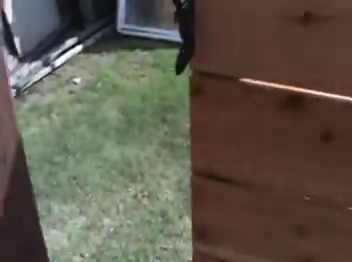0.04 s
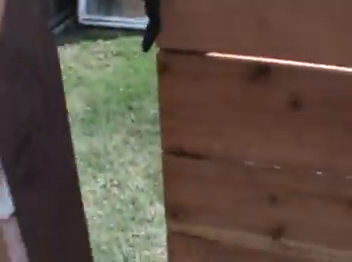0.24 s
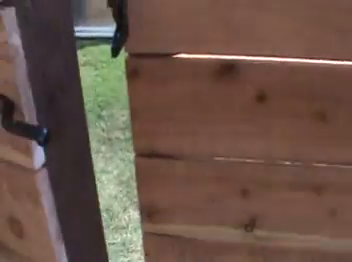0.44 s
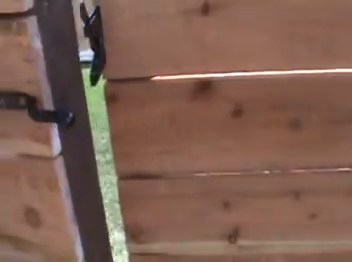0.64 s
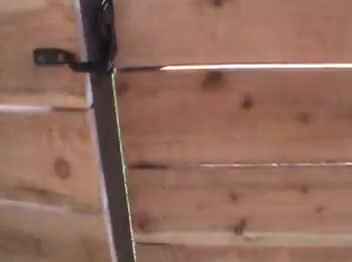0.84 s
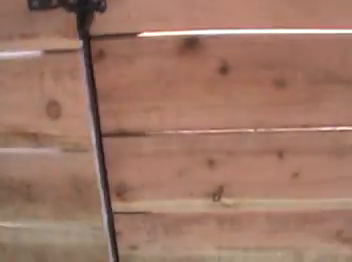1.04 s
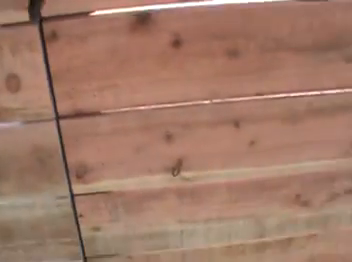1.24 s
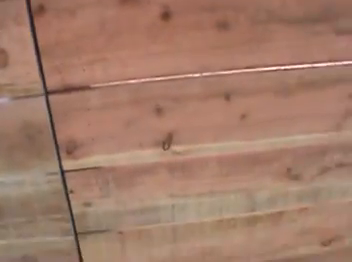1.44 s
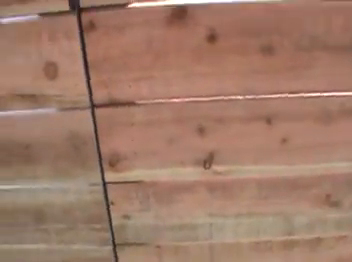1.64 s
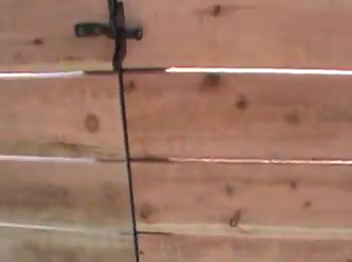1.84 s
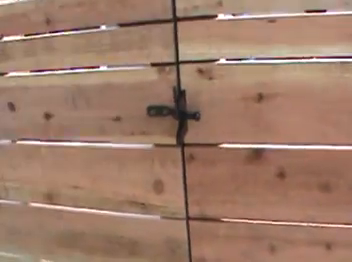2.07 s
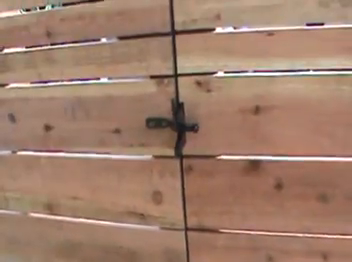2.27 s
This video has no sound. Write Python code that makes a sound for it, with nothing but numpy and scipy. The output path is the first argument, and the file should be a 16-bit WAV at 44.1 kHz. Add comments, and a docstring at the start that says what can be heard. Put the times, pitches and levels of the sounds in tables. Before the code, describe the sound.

Metal gate latch clacking and rattling outdoors, following a faint hinge squeak.

```python
"""A wooden garden gate, close to a hand-held stereo microphone, with a far hush behind it and light
wind on both ports. First the gate swings shut, its hinge rubbing and squeaking faintly. From 1.2 s the
steel latch is shaken in its catch: clacks and scrapes ring the steel and knock the boards, the bar rings
free between contacts, and the fence answers briefly. At 2.1 s the rattle cuts off abruptly, leaving its
short echo and the hush."""
import sys
import numpy as np
from scipy import signal
from scipy.fft import rfft, irfft, next_fast_len
from scipy.io import wavfile
from scipy.ndimage import uniform_filter1d, minimum_filter1d, map_coordinates

SR = 44100
rng = np.random.default_rng(int(sys.argv[2]) if len(sys.argv) > 2 else 0)


def wav_record(signal):
    """Record a signal, one row per channel, as 16-bit PCM in the file named by sys.argv[1]."""
    frames = np.transpose(np.atleast_2d(signal))
    bounded = np.clip(frames, -1, 1)
    # unit amplitude maps onto the largest positive 16-bit level
    quanta = np.round(bounded * 32767).astype(np.int16)
    wavfile.write(sys.argv[1], SR, quanta)


N = 101782
TIME = np.arange(N) / SR


def amp(db):
    return 10 ** (np.asarray(db) / 20)


def unit_rms(x):
    return x / np.sqrt(np.mean(x ** 2, axis=-1, keepdims=True) + 1e-20)


def along(points, hz):
    """Read (Hz, value) points on a log frequency axis."""
    freqs, values = np.transpose(points)
    return np.interp(np.log(hz + 1), np.log(freqs + 1), values)


def level_curves(rows):
    """A dB curve for each level column, silent outside the rows' times."""
    times, *columns = np.transpose(rows)
    return [np.interp(TIME, times, db, left=-120, right=-120) for db in columns]


def wobble(rate):
    """A smooth random curve, rate knots a second."""
    return map_coordinates(rng.standard_normal(int(N * rate / SR) + 4), [TIME * rate])


def filtered(x, response):
    """Pass x through a complex response of frequency."""
    size = next_fast_len(x.shape[-1] + SR // 4)
    return irfft(rfft(x, size) * response(np.fft.rfftfreq(size, 1 / SR)), size)[..., :x.shape[-1]]


def stereo_noise(colour, correlation):
    """Coloured noise of rms 1, partly alike left and right."""
    mid, side = unit_rms(filtered(rng.standard_normal((2, N)), lambda hz: amp(along(colour, hz))))
    turn = np.arccos(correlation) / 2
    return np.cos(turn) * mid + np.sin(turn) * side * [[1], [-1]]


# The air beyond the garden. Each row: frequency in Hz, relative level in dB.
HUSH_COLOUR = [(35, -31), (60, -3.5), (220, 2), (880, -8), (2800, -13.5), (11000, -24.5), (16000, -47)]

def distant_hush():
    """A steady low hush from far off, nearly the same on both sides."""
    return amp(-40.5) * stereo_noise(HUSH_COLOUR, 0.89)


# Wind at the microphone. Each row: frequency in Hz, relative level in dB.
WIND_COLOUR = [(25, 0), (65, 1), (150, -5.5), (400, -26.5), (900, -44)]
# Single puffs. Each row: time of the crest in seconds, level in dB.
WIND_PUFFS = [(0.212, -45.5), (.306, -41), (0.507, -42), (0.676, -38), (0.731, -46), (1.45, -35.5),
              (2.04, -38)]

def port_wind(breeze_db=-42, puff_s=0.093):
    """A breeze and its puffs rumble on the two ports, unevenly from side to side."""
    strength = amp(breeze_db) + sum(amp(db) * np.exp(-((TIME - s) / puff_s) ** 2) for s, db in WIND_PUFFS)
    port_db = 1.1 * np.array([wobble(32), wobble(9.9)]) + [[1.1], [-1.1]]
    return strength * amp(port_db) * stereo_noise(WIND_COLOUR, 0.46)


# The fence beside the gate. Each row: frequency in Hz, seconds to fall 60 dB.
FENCE_DECAY = [(200, 0.14), (10000, 0.09)]

def fence_echo(x):
    """The fence throws back a short diffuse echo whose treble dies first."""
    hz, t, spectrum = signal.stft(rng.standard_normal((2, SR // 2)), SR, nperseg=256)
    decay = amp(-60 * t / along(FENCE_DECAY, hz)[:, None])
    tail = signal.istft(spectrum * decay, SR, nperseg=256)[1]
    return signal.fftconvolve(x[None], tail / np.linalg.norm(tail[0]), axes=1)[:, :N]


# The hinge rubbing through the swing. Each row: time in seconds, level in dB.
HINGE_RUB = [(0, -46), (.645, -46.5), (.66, -35), (.78, -42), (.85, -44), (.862, -38), (.89, -43.5),
             (1.2, -50.5)]
# The hiss of that rubbing. Each row: frequency in Hz, relative level in dB.
HINGE_COLOUR = [(900, -4), (3400, -3), (4850, -3.5), (5400, -9), (15000, -23)]
# Squeaks. Each row: start and end in seconds, first, middle and last pitch in Hz, level in dB.
HINGE_SQUEAKS = [(.235, 0.347, 3420, 3620, 3500, -43), (.35, 0.473, 2400, 2390, 2450, -51.5),
                 (.47, .555, 4930, 5250, 5050, -51.5), (0.434, .66, 10500, 12030, 11400, -51),
                 (0.647, 0.884, 1626, 1645, 1480, -42.5), (0.658, 0.709, 3650, 3000, 3670, -40.5),
                 (0.691, 0.73, 4900, 4830, 4800, -40.5)]

def hinge(waver_hz=70, stutter_db=4, stutter_rate=110):
    """The turning hinge rubs with a faint hiss and thin squeaks that glide and stutter."""
    out = amp(level_curves(HINGE_RUB)[0] + 1.8 * wobble(stutter_rate)) * stereo_noise(HINGE_COLOUR, 0.46)
    for start, end, first, middle, last, db in HINGE_SQUEAKS:
        progress = np.clip((TIME - start) / (end - start), 0, 1)
        bend = (4 * middle - 2 * first - 2 * last) * progress * (1 - progress)
        hz = first + (last - first) * progress + bend
        phase = 2 * np.pi * np.cumsum(hz + waver_hz * wobble(870)) / SR
        swell = np.sqrt(np.sin(np.pi * progress)) * (progress < 1)
        out += amp(db + stutter_db * wobble(stutter_rate)) * swell * np.sin(phase)
    return out


def resonate(x, modes, scatter_db, colour=None, colour_db=0, detune=0):
    """Ring each row of x through its own scattered modes plus a broad colour, at unit power gain."""
    gains = amp(scatter_db * rng.standard_normal((len(x), len(modes), 1)))
    drift = detune / 4000 * rng.standard_normal(gains.shape)  # detune: share of the pitch at 4 kHz
    def response(hz):
        total = amp(colour_db + along(colour, hz)) if colour else 0
        for k, (mode_hz, width, db) in enumerate(modes):
            centre = mode_hz + drift[:, k] * mode_hz ** 2
            damping = 1j * hz * width
            total = total + (-1) ** k * gains[:, k] * amp(db) * damping / (centre**2 - hz**2 + damping)
        return total / np.sqrt(np.mean(abs(total) ** 2, axis=-1, keepdims=True))
    return filtered(x, response)


# Modes of the latch and of the boards. Each row: frequency in Hz, width in Hz, relative level in dB.
LATCH_MODES = [(1321, 21.5, 13), (1612, 40, 7), (2450, 68, -10), (3720, 125, 2), (4217, 160, -2.5),
               (6750, 240, -31)]
BOARD_MODES = [(209.6, 23, -3.5), (333.6, 59.4, 1.5), (663, 102, -2.5), (937, 92, -2)]
# Bright modes of the latch bar. Each row: frequency in Hz, relative level in dB.
BAR_MODES = [(3780, -8.5), (5640, -2), (6240, -7.5), (7910, -9), (9200, -10.5), (10300, -6.5), (12400, -15),
             (13600, -32)]
# Broad colour between the steel's modes. Each row: frequency in Hz, relative level in dB.
LATCH_COLOUR = [(450, -20), (1100, -9), (1400, 4), (2800, -3.5), (5300, -12), (6800, -3.5), (7500, -53)]
BAR_COLOUR = [(10000, 3), (11700, -11), (13500, 1.5), (15500, -31)]

def gate_parts(drive, scatter_db=0, hardness=0, detune=0, bar_width_hz=37):
    """Three drives ring the latch (brighter when struck hard), its bar and the boards."""
    knee_hz = 2000 * 2 ** (abs(hardness) / 4)
    def latch_tilt(hz):
        tilt_db = hardness * np.log2(np.clip(hz, 1000, knee_hz) / 2000)
        loss_db = 2.5 * np.log2(np.maximum(hz / knee_hz, 1))
        return amp(tilt_db - loss_db) / (1 + (hz / 7160) ** 10)
    latch = resonate(drive[0], LATCH_MODES, scatter_db, LATCH_COLOUR, colour_db=2.5, detune=detune)
    touching_modes = [(hz, bar_width_hz, db) for hz, db in BAR_MODES]
    bar = resonate(drive[1], touching_modes, scatter_db, BAR_COLOUR, colour_db=7)
    boards = resonate(drive[2], BOARD_MODES, scatter_db)
    return (filtered(latch, latch_tilt),
            filtered(bar, lambda hz: 1 / (1 + (6000 / (hz + 1)) ** 6)),
            filtered(boards, lambda hz: 1 / (1 + (150 / (hz + 1)) ** 4)))


# The bar bouncing clear. Each row: start in seconds, relative level in dB, favoured mode in Hz.
BAR_BOUNCES = [(1.228, -24.5, 9200), (1.525, -26.5, 13600), (1.579, -34, 3780), (1.676, -54, 9200),
               (1.775, -39.5, 6240), (1.882, -42.5, 13600), (2.041, -36, 12400), (2.041, -35, 10300)]

def free_bar(t60_s=0.17, favour_db=15, shortest_s=0.025):
    """Clear of the catch, the bar rings in pure tones until a later contact stops it."""
    out = np.zeros(N)
    contacts = np.array([row[0] for row in LATCH_CONTACTS] + [N / SR])
    hz, mode_db = np.transpose(BAR_MODES)[:, :, None]
    for start, db, favoured_hz in BAR_BOUNCES:
        landing = contacts[contacts > start + shortest_s][0]
        t = np.arange(int((landing - start) * SR)) / SR
        ring_db = db + mode_db + favour_db * (hz == favoured_hz) - 60 * t / t60_s
        ring = amp(ring_db) * np.sin(2 * np.pi * hz * t)
        out[int(start * SR):][:len(t)] += ring.sum(0) * np.clip((t[-1] - t) * 250, 0, 1)
    return out


# The latch sliding. Each row: time in seconds, steel rubbing in dB, boards shaking in dB.
SCRAPE_LEVELS = [(1.217, -26.5, -43), (1.385, -17, -20), (1.45, -16, -28.5), (1.59, -26.5, -32.5),
                 (1.65, -30, -32), (1.75, -45.5, -32.5), (1.83, -24.5, -28.5), (1.91, -39, -37),
                 (1.98, -36.5, -36.5), (2.118, -34, -35.5)]

def latch_scrape():
    """Steel rubs grittily in the catch and shakes the boards."""
    rub_db, shake_db = level_curves(SCRAPE_LEVELS)
    grit = unit_rms(rng.standard_normal((3, 1, N)) * amp(3.5 * wobble(300) + 1.7 * wobble(60)))
    latch, bar, boards = gate_parts(grit)
    return (amp(rub_db - 2.5) * (latch + amp(-13) * bar) + amp(shake_db) * boards)[0]


# The latch striking its catch, close up. Each row: start in seconds, relative level in dB, bar treble
# in relative dB, hardness in dB per octave, seconds for the latch's chatter to fall 40 dB.
LATCH_CONTACTS = [(1.2194, -0.5, -30, 2.5, 0.05), (1.248, -6.5, -13, 3.3, 0.033),
                  (1.266, -7, -18, 5.5, 0.021), (1.2758, -3.5, -13, 4, 0.045), (1.2844, 0.5, -15, -3, 0.03),
                  (1.309, -1.5, -21, 3.5, 0.028), (1.3238, 3, 0, 6, 0.0076),
                  (1.335, -0.5, -7.5, 2.5, 0.075), (1.36, -14, 0.5, 7.5, 0.079),
                  (1.397, -18.5, -2.5, 5.5, 0.059), (1.479, -3, -37, 3, 0.025), (1.506, -6, -41, 4, 0.02),
                  (1.5215, -9, -21, 3.7, 0.042), (1.5546, -11.5, -3.5, 3.5, 0.056),
                  (1.577, -7.5, -36, -4.5, 0.02), (1.6222, -8.5, -9.5, 2.9, 0.021),
                  (1.679, -21, -19, -11.5, 0.13), (1.6921, -7, -42, 1.5, 0.022),
                  (1.755, -21, -44, -9, 0.11), (1.7685, -9.5, -13.5, 6.5, 0.016),
                  (1.7737, -6, -18, -5, 0.035), (1.7983, -5.5, -7, 0, 0.015), (1.8026, -14, -4, 7.5, 0.037),
                  (1.8213, -11, -36, 2.5, 0.031), (1.839, -19.5, -19, 8.5, 0.02),
                  (1.883, -19, -23, 1, 0.045), (1.9261, -6, -31, 2, 0.052),
                  (1.9295, -11.5, -9.5, 5.5, 0.024), (1.9405, -13, -37, -3, 0.035),
                  (2.04, -14, -2, 2, 0.027), (2.0564, -20.5, -11, 4, 0.045), (2.099, -15.5, -16, 1, 0.027)]

def latch_clacks(steel_rise_s=0.00084, board_rise_s=0.011):
    """Each contact is a short chatter of metal on metal; the boards answer more slowly."""
    start, db, treble_db, hardness, length = np.transpose(LATCH_CONTACTS)[:, :, None]
    t = np.arange(SR // 8) / SR
    rise = 1 - np.exp(-t / np.reshape([steel_rise_s, steel_rise_s, board_rise_s], (3, 1, 1)))
    fall_speed = np.reshape([1, 1.66, 0.5], (3, 1, 1))  # latch, bar, boards
    fall = amp(-40 * t / length * fall_speed)
    chatter = rng.standard_normal((len(start), 3, len(t))).swapaxes(0, 1) * rise * fall
    latch, bar, boards = gate_parts(chatter, scatter_db=4.5, hardness=hardness, detune=0.053)
    clacks = amp(db - 4) * (latch + amp(treble_db + 5) * bar + amp(-11.5) * boards)
    samples = np.round(start * SR).astype(int) + np.arange(len(t))
    return np.bincount(samples.ravel(), clacks.ravel(), N + SR)[:N]


# The gate's place between the ports. Each row: frequency in Hz, left over right in dB.
GATE_PAN = [(300, 0.5), (1400, -0.5), (13000, 2.5)]
# The part of the clacks that differs between the ports. Each row: frequency in Hz, gain in dB.
PORT_DIFFERENCE = [(2500, -18), (13000, -5)]

def scene(cutoff_s=2.119, echo_db=-8):
    """The gate close and almost centred, the garden around it; the rattle cuts off abruptly."""
    sounding = np.clip((cutoff_s - TIME) * 300, 0, 1)
    gate = latch_clacks() + latch_scrape() + free_bar()
    direct = filtered(gate, lambda hz: amp(along(GATE_PAN, hz) * np.array([[0.5], [-0.5]])))
    side = filtered(latch_clacks(), lambda hz: amp(along(PORT_DIFFERENCE, hz))) * [[1], [-1]]
    echo = amp(echo_db) * fence_echo(sounding * gate)
    return sounding * (direct + side) + echo + hinge() + distant_hush() + port_wind()


def record(dry, ceiling=0.57, limiter_s=0.004, low_hz=10, top_hz=15780):
    """Behind the microphone, a quick limiter tames the loudest clacks and the band is cut at both ends."""
    span = int(limiter_s * SR) + 1
    gain = np.minimum(1, ceiling / (abs(dry).max(0) + 1e-9))
    gain = uniform_filter1d(minimum_filter1d(gain, span), span)
    return filtered(dry * gain, lambda hz: (hz > low_hz) & (hz < top_hz))


dry = scene()
out = record(dry)
wav_record(out)
```